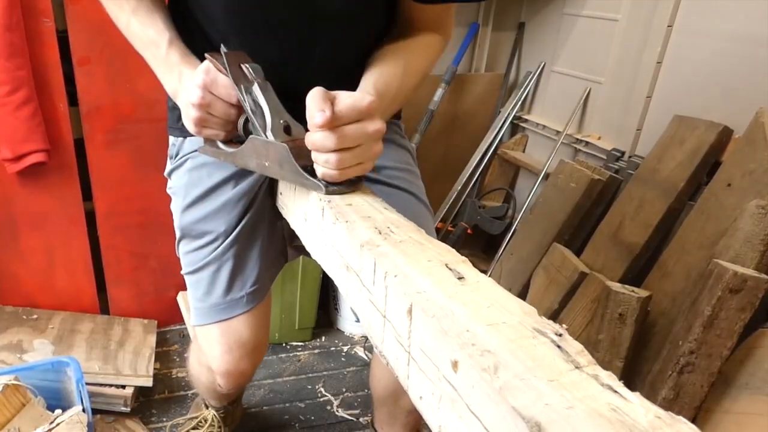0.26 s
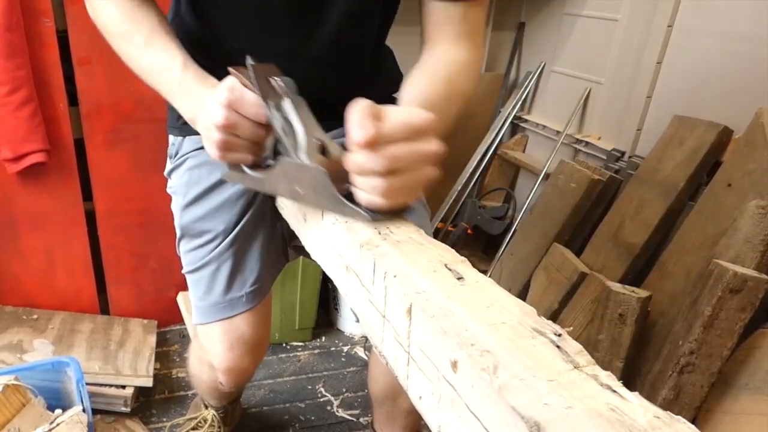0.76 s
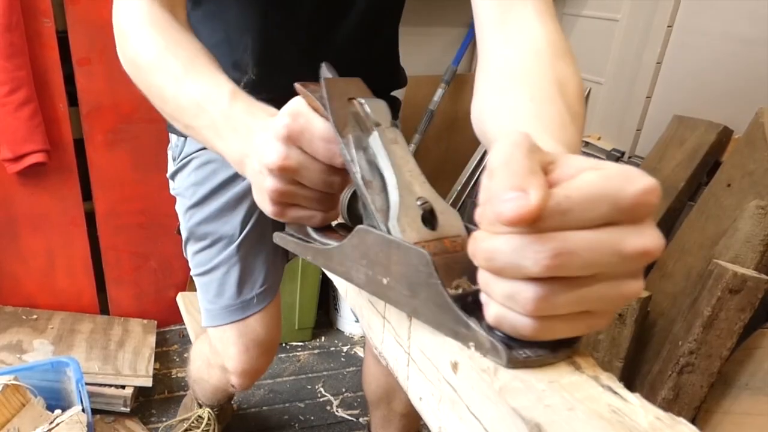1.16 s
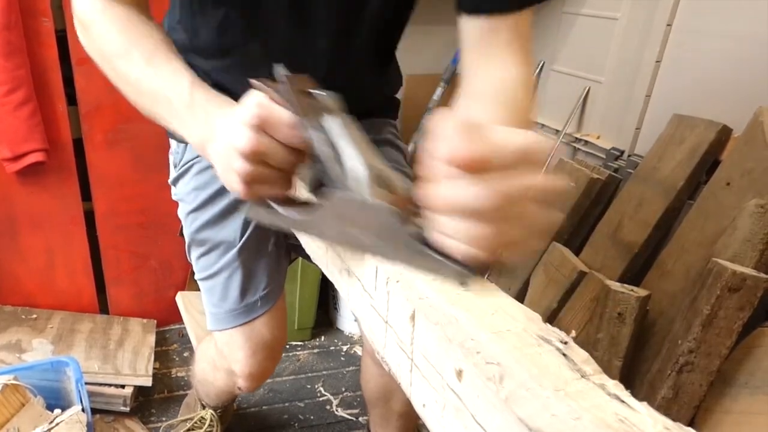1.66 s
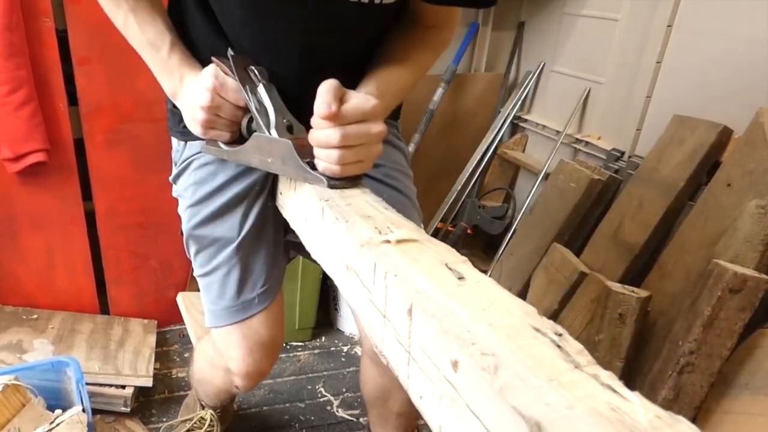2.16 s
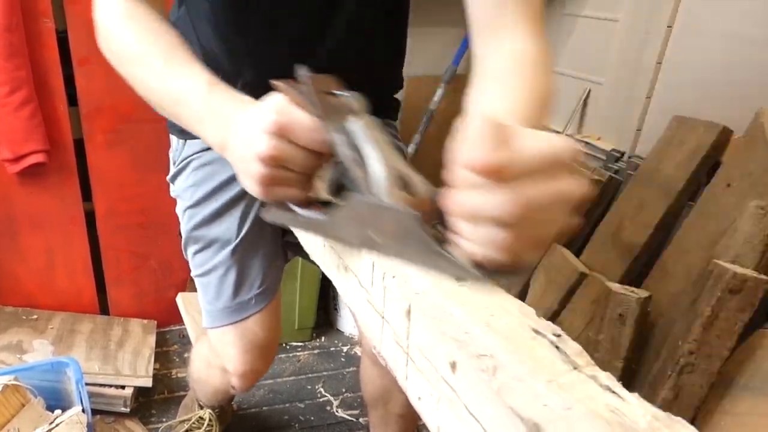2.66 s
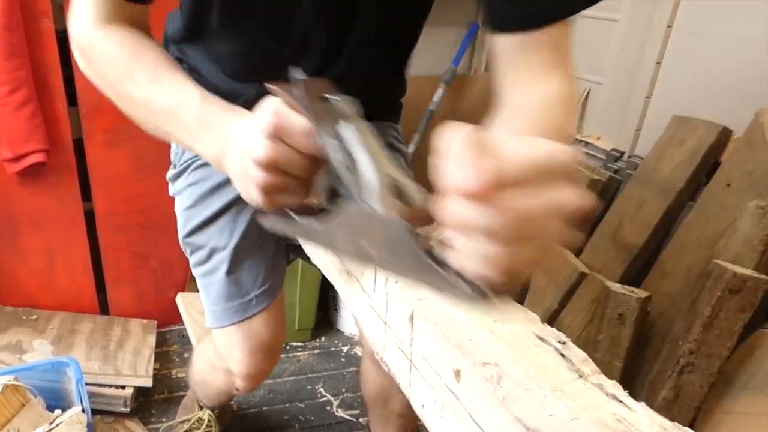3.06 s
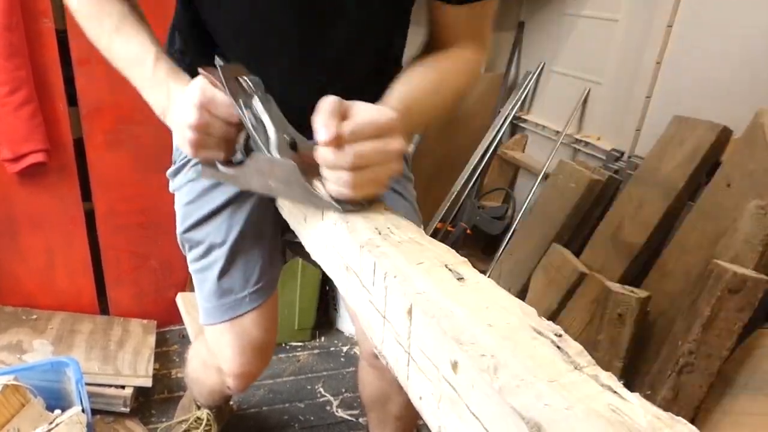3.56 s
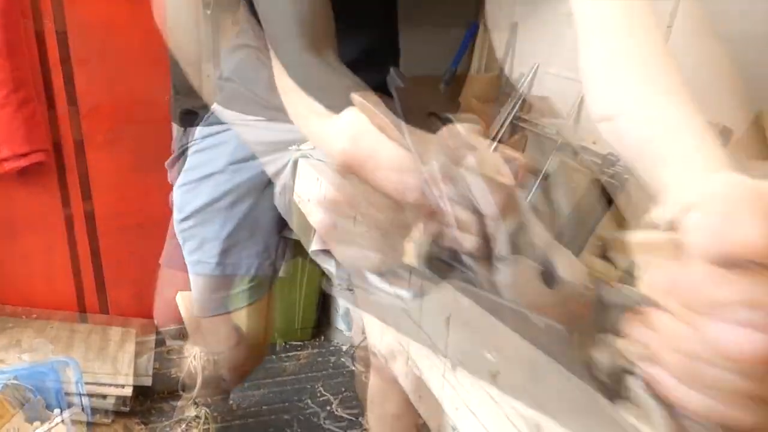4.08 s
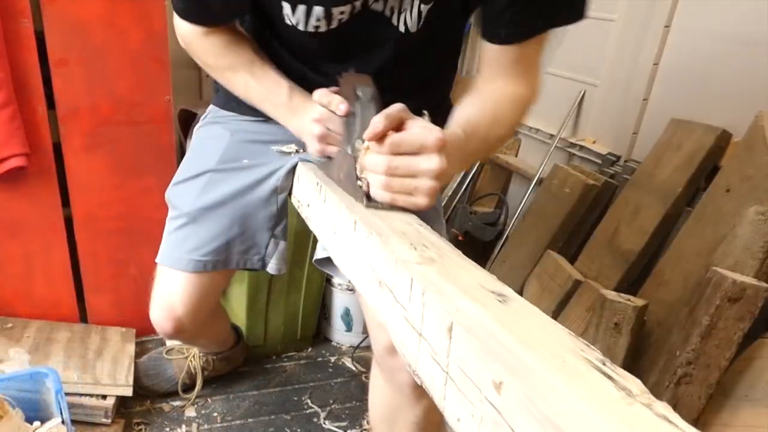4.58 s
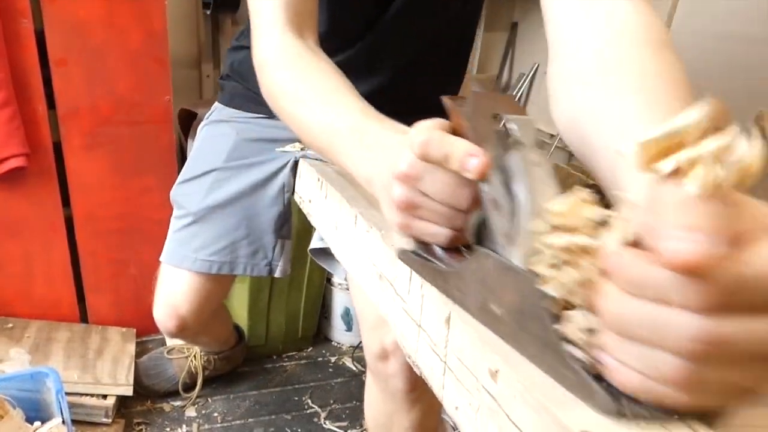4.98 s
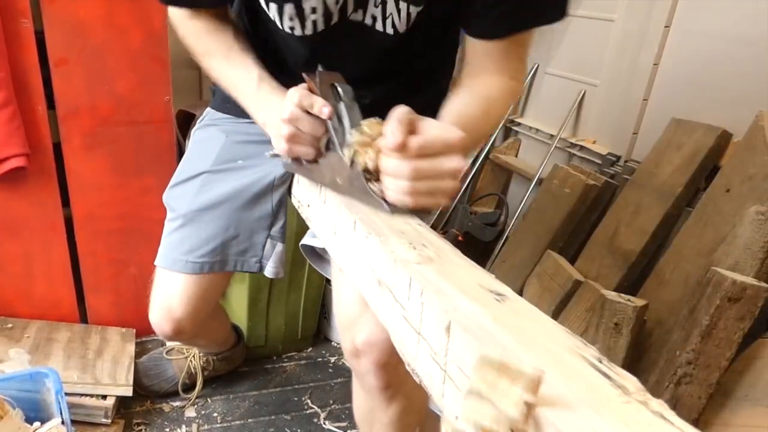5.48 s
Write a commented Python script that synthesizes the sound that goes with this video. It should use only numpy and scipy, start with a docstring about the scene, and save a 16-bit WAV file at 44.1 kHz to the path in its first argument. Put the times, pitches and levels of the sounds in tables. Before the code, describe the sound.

Eight quick back-and-forth planing strokes on wood, miked closely in stereo with short hard room reflections. Returns rattle, knock and groan low in the post; forward strokes bite, rip and hiss, some dropping in pitch. Raw, gritty and irregular at first, then fuller and more even, with long shavings crackling near the end over a faint room rush.

```python
"""A small workshop: a steel hand plane is dragged back eight times along a rough wooden post,
each return followed by a quick forward stroke. Raw face turns flat midway.
Sole: filtered slip grains judder, filtered noise hisses; bumps and drags ring or hum the post's modes.
Blade: two damped modes chirp and ping; falling noise bands rasp; noise bursts snap splinters.
Forward strokes tear off shavings as dense cracks, the last ones long and rustling."""
import sys
import numpy as np
from scipy import signal
from scipy.fft import rfft, irfft, next_fast_len
from scipy.io import wavfile
from scipy.ndimage import uniform_filter1d, map_coordinates

SR = 44100
rng = np.random.default_rng(int(sys.argv[2]) if len(sys.argv) > 2 else 0)


def unload_audio(sound):
    """Save the sound as a 16-bit wav file, at the path given as the first command line argument."""
    columns = np.transpose(np.atleast_2d(sound))
    # keep every value between -1 and 1, then stretch to whole-number steps
    steps = np.round(np.clip(columns, -1, 1) * 32767)
    wavfile.write(sys.argv[1], SR, steps.astype(np.int16))


N = 252693
T_S = np.arange(N) / SR
RING_S = np.arange(SR // 5) / SR  # time after a blow


def amp(db):
    """dB to linear gain."""
    return 10 ** (np.asarray(db) / 20)


def unit(x):
    """Scale to rms 1."""
    return x / np.sqrt(np.mean(x ** 2) + 1e-20)


def peaked(x):
    """Scale to peak 1."""
    return x / np.abs(x).max()


def noise(size=N):
    """White Gaussian noise."""
    return rng.standard_normal(size)


def fade(t60_s):
    """Exponential decay after a blow, -60 dB at t60_s."""
    return np.exp(-np.log(1000) * RING_S / t60_s)


def along(points, hz):
    """Interpolate (f/Hz, value) points on a log axis."""
    f, v = np.transpose(points)
    return np.interp(np.log(hz + 1), np.log(f), v)


def wobble(rate_hz):
    """Smooth random curve, rate_hz knots per second."""
    knots = noise(int(N * rate_hz / SR) + 4)
    return map_coordinates(knots, [np.arange(N) * rate_hz / SR])


def colour(x, points):
    """Minimum-phase filter of the given (f/Hz, level/dB) shape, via the folded cepstrum."""
    m = 2 * next_fast_len(len(x) // 2 + 4096)
    gain = amp(along(points, np.fft.rfftfreq(m, 1 / SR)))
    cepstrum = irfft(np.log(gain))
    cepstrum[1:m // 2] *= 2
    cepstrum[m // 2 + 1:] = 0
    return irfft(rfft(x, m) * np.exp(rfft(cepstrum)))[:len(x)]


def ring(modes):
    """Impulse response of damped modes, alternating in sign."""
    response = np.zeros(len(RING_S))
    for k, (hz, db, t60_s) in enumerate(modes):
        response += (-1) ** k * amp(db) * fade(t60_s) * np.sin(2 * np.pi * hz * RING_S)
    return response


def varied(modes):
    """Per-blow mode mix: common detuning (sd 2.5 %), independent levels (sd 2.5 dB)."""
    tuning = 1 + rng.standard_normal() * np.array([.025, 0, 0])
    levels = noise((len(modes), 1)) * [0, 2.5, 0]
    return np.asarray(modes) * tuning + levels


def through(x, response):
    """Convolve, keep the input length."""
    return signal.fftconvolve(x, response)[:len(x)]


def grains(rate_hz, spread_db):
    """Tiny slips at random moments, of random size and sign, rms 1."""
    sizes = amp(spread_db * np.clip(noise(), -2, 2)) * rng.choice([-1, 1], N)
    return unit(sizes * (rng.random(N) < rate_hz / SR))


def wavering(x, depth_s, rate_hz):
    """Randomly drifting delay: detunes a ring."""
    return map_coordinates(x, [np.arange(N) + depth_s * SR * wobble(rate_hz)])


def swept(hz, width_hz):
    """Rms-1 noise band centred on the curve hz: slow noise pair on a quadrature carrier."""
    pole = np.exp(-np.pi * width_hz / SR)
    slow = signal.lfilter([1], np.poly([pole, pole]), noise((2, len(hz))))
    phase = 2 * np.pi * np.cumsum(hz) / SR
    return unit(slow[0] * np.cos(phase) + slow[1] * np.sin(phase))


def add(track, s, sound):
    """Mix a sound into a track at time s."""
    start = max(round(s * SR), 0)
    track[start:start + len(sound)] += sound[:N - start]


def room_tone(floor_db):
    """Faint steady rush of the room: coloured noise."""
    shape = [(25, -47), (80, -9.5), (300, -8.0), (15000, -45.5)]
    return amp(floor_db) * unit(colour(noise(), shape))


def echo(x, t60_s, gap_s):
    """Cluttered-wall reflections: decaying noise tails, redrawn every 0.1 s as the plane travels."""
    hop = SR // 10
    window = signal.get_window("hann", 2 * hop)
    padded = np.pad(x, (hop, 2 * hop))
    track = np.zeros(len(padded) + len(RING_S))
    for start in range(0, N + hop, hop):
        tail = noise(len(RING_S)) * fade(t60_s) * (RING_S > gap_s)
        answer = signal.fftconvolve(window * padded[start:start + 2 * hop], tail / np.linalg.norm(tail))
        track[start:start + len(answer)] += answer
    return track[hop:hop + N]


# stereo side spectrum: f/Hz, level/dB
SIDE_SPECTRUM = [(60, -6.5), (280, -17.5), (600, -7), (2000, -5.5), (4000, -10.5), (9000, -6.5)]
# channel tilt: f/Hz, left over right/dB
LEFT_OVER_RIGHT = [(250, 0.2), (1100, -2.5), (4000, -0.6)]


def workshop(x, wet_db):
    """Close walls: echo thickens the mid, a shorter echo spreads the sides, a tilt leans the channels."""
    mid = x + amp(wet_db) * colour(echo(x, t60_s=0.11, gap_s=0.0047), [(350, -3), (1200, -4.5)])
    side = colour(echo(x, t60_s=0.028, gap_s=0.0049), SIDE_SPECTRUM)
    channels = []
    for sign in (1, -1):
        tilt = [(hz, sign * db / 2) for hz, db in LEFT_OVER_RIGHT]
        channels.append(colour(mid + sign * side, tilt))
    return np.array(channels)


# snap spectrum: f/Hz, level/dB
SNAP_SPECTRUM = [(800, 5.5), (4400, 18.5), (12800, 6.5), (16000, -10)]
# splinters: t/s, relative level/dB, crumble re crack/dB
SNAPS = [(0.09, -8, -10), (0.399, -19.5, 6), (0.4945, -17, -18), (1.032, -16, -18), (1.086, -29, 4),
         (1.3682, -3.5, -20), (2.0054, -13, -24), (2.033, -14, -11), (2.402, -16.5, 0), (2.733, -14.5, 9),
         (3.059, -15.5, 2), (3.3975, -13.5, -14), (3.5777, -16, -15.5), (3.78, -12, -6), (3.8427, -10, -20),
         (5.504, -13, 11)]


def snaps(snap_db, crumble_t60_s):
    """A splinter cracks off as a noise burst; a slower tail crumbles under the sole, strong on some."""
    track = np.zeros(N)
    for s, db, crumble_db in SNAPS:
        decay = fade(.008) + amp(crumble_db) * fade(crumble_t60_s)
        burst = noise(len(RING_S)) * decay
        add(track, s, amp(db + snap_db) * peaked(colour(burst, SNAP_SPECTRUM)))
    return track


# blade and cap-iron modes: f/Hz, level/dB, t60/s
BLADE_MODES = [(1633, 9, 0.051), (1190, -3.5, 0.067)]
# blade catches: t/s, relative level/dB
CHIRPS = [(0.0826, -24), (0.4778, -26), (0.703, -22.5), (1.331, -39), (1.383, -41), (1.419, -38),
          (1.596, -23.5), (1.76, -32), (1.8176, -29.5), (2.044, -34.5), (3.1616, -31), (3.385, -35.5),
          (3.41, -34), (3.49, -39), (3.582, -30.5), (5.5, -22.5)]


def chirps(chirp_db, swell_s, tail_db):
    """The edge sticks and slips near the first listed blade mode for a few cycles, then lets go."""
    track = np.zeros(N)
    for s, db in CHIRPS:
        hz = BLADE_MODES[0][0] * (1 + 0.02 * rng.standard_normal())
        stick_slip = np.exp(-(RING_S / swell_s - 1.3) ** 2) * np.sin(2 * np.pi * hz * RING_S)
        tail = amp(tail_db) * ring(varied(BLADE_MODES))
        add(track, s - .001, amp(db + chirp_db) * (stick_slip + tail))
    return track


# post-on-trestle modes: f/Hz, level/dB, t60/s
POST_MODES = [(174.4, -5.5, 0.11), (309.7, 0, 0.15), (371.1, -5.5, 0.22), (454, -10.5, 0.12),
              (668, -13, 0.17)]
# thud spectrum: f/Hz, level/dB
THUD_SPECTRUM = [(25, -54.5), (80, -14.5), (160, -0.5), (330, 0.5), (680, -3), (850, -9), (1500, -15.5),
                 (8000, -62.5)]
# sole hits a bump: t/s, relative level/dB, tock f/Hz, hardness (clack gain)/dB
KNOCKS = [(0.36, -10, 667, -2), (0.491, -9.5, 465, -4), (0.760, -7, 519, -4), (0.866, -10.5, 484, -4),
          (1.033, -8, 550, -6), (1.322, -10.5, 420, -2.5), (1.458, -10, 646, -7), (1.612, -5, 472, -13),
          (1.655, -6.5, 405, -30), (1.803, -7.5, 507, -19), (2.028, -7, 597, -11), (2.151, -8, 610, -12),
          (2.266, -6, 480, -8), (2.279, -7.5, 493, -18), (2.33, -8, 572, -39), (2.689, -9.5, 463, -2),
          (2.85, -8.5, 610, -1.5), (3.008, -6, 425, -6.5), (3.103, -9.5, 494, -7), (3.661, -18, 646, 2),
          (4.172, -23.5, 526, 1.5), (4.295, -12, 640, -13), (4.479, -23.5, 590, 5.5),
          (4.595, -12.5, 707, 2.5), (4.698, -8, 445, -4), (4.716, -12.5, 850, -24), (4.987, -7, 452, -18),
          (5.197, -11, 593, -3), (5.22, -10, 616, -7), (5.263, -11.5, 444, -7.5), (5.301, -12, 424, -16),
          (5.568, -7, 623, -21)]


def knocks(tock_db, post_db, thud_db, clack_db, tock_t60_s, thud_t60_s, clack_t60_s, grip_s):
    """Per bump: hollow tock, noise thud, hardness-scaled clack, post boom that builds until the grip smothers it."""
    track = np.zeros(N)
    size = len(RING_S)
    for s, db, hz, hardness_db in KNOCKS:
        tock = peaked(np.sin(2 * np.pi * hz * RING_S) * fade(tock_t60_s) * (1 - fade(0.0025)))
        thud = peaked(colour(noise(size) * fade(thud_t60_s), THUD_SPECTRUM))
        crack = signal.unit_impulse(size) + 0.18 * noise(size) * fade(clack_t60_s)
        clack = peaked(colour(crack, [(350, -13.0), (700, 18.0), (2000, -2.5), (14000, -32.0)]))
        boom = peaked(ring(varied(POST_MODES)) * RING_S * np.exp(-(RING_S / grip_s) ** 2))
        body = amp(tock_db) * tock + amp(thud_db) * thud + amp(post_db) * boom
        add(track, s, amp(db) * (body + amp(clack_db + hardness_db) * clack))
    return track


def raw_face(flat_from_s=3.85):
    """1 while the face is raw, 0 once it is planed flat."""
    return np.interp(T_S, [flat_from_s, flat_from_s + 0.035], [1, 0])


def roughness(left=0.73):
    """1 on the raw face, `left` once it is planed flat."""
    return left + (1 - left) * raw_face()


EDGE_DB = 27  # rise over one attack time, fall per release time


def stroke(start_s, length_s, crest_s, swell_db, fade_db, attack_s, release_s):
    """Gain of one movement: attack, swell to the crest, fade to the end, release."""
    t = T_S - start_s
    hold_db = np.interp(t, [0, min(crest_s, length_s), length_s], [-swell_db, 0, -fade_db])
    edges = np.maximum(-t, 0) / attack_s + np.maximum(t - length_s, 0) / release_s
    return amp(hold_db - EDGE_DB * edges)


PUSH_ATTACK_S, PUSH_RELEASE_S = 0.024, 0.12  # blade bites; arms run out of reach
RETURN_ATTACK_S, RETURN_RELEASE_S = 0.012, 0.029


def push(start_s, length_s, crest_s, swell_db, fade_db):
    """Gain of a forward stroke."""
    return stroke(start_s, length_s, crest_s, swell_db, fade_db, PUSH_ATTACK_S, PUSH_RELEASE_S)


def pull(start_s, length_s, crest_s, swell_db, fade_db):
    """Gain of a return stroke."""
    return stroke(start_s, length_s, crest_s, swell_db, fade_db, RETURN_ATTACK_S, RETURN_RELEASE_S)


# forward strokes: start t/s, length/s, time to fastest rub/s,
# relative judder, scrape, tearing levels/dB, scrape fade/dB
PUSHES = [(0.341, 0.26, 0.19, -18, -27.5, -25, 20), (0.979, 0.19, 0.13, -19.5, -30.5, -22.5, 10),
          (1.59, 0.28, 0.14, -22.5, -32, -33, 2), (2.255, 0.2, 0.3, -19, -30, -47, 4),
          (2.981, 0.21, 0.11, -16.5, -28.5, -30, 2.5), (3.772, 0.18, 0.075, -17.5, -34, -20.5, 1),
          (4.547, 0.37, 0.027, -24.5, -30.5, -21.5, 13), (5.451, 0.5, 0.063, -22, -28.5, -58, 11)]


def pushing():
    """1 during a forward stroke, ramping to 0 outside."""
    total = np.zeros(N)
    for s, length, *_ in PUSHES:
        corners = [s - PUSH_ATTACK_S, s, s + length, s + length + PUSH_RELEASE_S]
        total += np.interp(T_S, corners, [0, 1, 1, 0])
    return total


# return strokes: start t/s, length/s, time to heaviest judder/s,
# relative judder, scrape levels/dB, scrape fade/dB
RETURNS = [(0.054, 0.33, 0.12, -20.5, -32, 38), (0.68, 0.22, 0.053, -19.5, -33, 27),
           (1.3, 0.25, 0.082, -22.5, -29, 39), (1.938, 0.24, 0.021, -22, -29.5, 16.5),
           (2.572, 0.41, 0.09, -24, -40.5, 15), (3.398, 0.27, 0.16, -19, -36.5, 16),
           (4.164, 0.36, 0.29, -25, -37.5, 8), (4.978, 0.44, 0.34, -25.5, -35.5, 11.5)]
SHUFFLE_S, SHUFFLE_JUDDER_DB, SHUFFLE_SCRAPE_DB = 0.055, -41, -45.5


def shuffles():
    """Small slide leading into each return, stronger while the face is raw."""
    return roughness() ** 2 * sum(pull(s - SHUFFLE_S, SHUFFLE_S, 0, 0, 0) for s, *_ in RETURNS)


def curl(s, half_s, db):
    """Gaussian swell of one long shaving coming free."""
    return amp(db) * np.exp(-((T_S - s) / half_s) ** 2)


# long shavings leave the mouth: loudest t/s, half-length/s, relative level/dB
CURLS = [(4.81, 0.041, -31), (5.647, 0.029, -35)]


def curls():
    """Swells of all the long shavings."""
    return sum(curl(*row) for row in CURLS)


def weight():
    """Bearing of the sole: peaks early in a push, and on each return where it rides the ridges."""
    total = amp(SHUFFLE_JUDDER_DB) * shuffles()
    for s, length, _, db, *_ in PUSHES:
        total += amp(db) * push(s, length, crest_s=0.071, swell_db=7.5, fade_db=14.5)
    for s, length, crest, db, *_ in RETURNS:
        total += amp(db) * pull(s, length, crest, swell_db=8.0, fade_db=14.5)
    return total


FASTEST_SHARE = 0.31  # fraction of a return at top speed


def rubbing():
    """Rub gain: swells to the fastest moment of a stroke, fades as the plane slows."""
    total = curls() + amp(SHUFFLE_SCRAPE_DB) * shuffles()
    for s, length, crest, _, db, _, fall_db in PUSHES:
        total += amp(db) * push(s, length, crest, swell_db=1.0, fade_db=fall_db)
    for s, length, *_, db, fall_db in RETURNS:
        total += amp(db) * pull(s, length, FASTEST_SHARE * length, swell_db=8.0, fade_db=fall_db)
    return total


BITE_FADE_DB = 21


def bite(curl_db=-4):
    """Tearing gain: deepest as the blade enters, again as a long shaving comes free."""
    total = amp(curl_db) * curls()
    for s, length, *_, db, _ in PUSHES:
        total += amp(db) * push(s, length, crest_s=0.0084, swell_db=9.5, fade_db=BITE_FADE_DB)
    return total


def chatter(chatter_db):
    """The edge catches on raw grain; each catch pings the blade, most freely on the way back."""
    catches = grains(rate_hz=65, spread_db=2)
    response = ring(BLADE_MODES) * (1 - fade(0.008))
    pings = wavering(through(catches, response), depth_s=.0003, rate_hz=45)
    contact = np.sqrt(weight() * rubbing()) * raw_face() * (1 - .5 * pushing())
    return amp(chatter_db) * contact * unit(pings)


# stick-slip on returns: start t/s, length/s, relative level/dB
GROANS = [(0.779, 0.13, -19.5), (1.298, 0.22, -23), (2.682, 0.087, -21.5), (4.31, 0.16, -23)]


def groans(groan_db, overtone_db):
    """Dragged back, the sole sticks and slips: a hum and octave waver about the post's strongest mode."""
    hz = POST_MODES[1][0] * (1 + .06 * wobble(60))
    phase = 2 * np.pi * np.cumsum(hz) / SR
    hum = np.sin(phase) + amp(overtone_db) * np.sin(2 * phase)
    tone = unit(hum * amp(4.5 * np.minimum(wobble(50), 1)))
    return amp(groan_db) * tone * sum(amp(db) * pull(s, length, 0, 0, 0) for s, length, db in GROANS)


# blade digs in: t/s, relative level/dB, drop time/s
DIGS = [(0.982, -15, 0.05), (1.597, -12.5, 0.0192), (2.265, -14.5, 0.038), (4.56, -16, 0.066),
        (5.497, -23.5, 0.033)]
DIG_START_HZ, DIG_AT_DROP_TIME_HZ = 1500, 843  # glide goes on to twice the drop time


def digs(dig_db, width_hz, attack_t60_s):
    """The edge's rasp falls in pitch as the cut deepens and loads the blade: a gliding noise band."""
    track = np.zeros(N)
    for s, db, drop_s in DIGS:
        hz = DIG_START_HZ * (DIG_AT_DROP_TIME_HZ / DIG_START_HZ) ** np.minimum(RING_S / drop_s, 2)
        envelope = (1 - fade(attack_t60_s)) * np.exp(-(RING_S / drop_s) ** 2)
        add(track, s, amp(db + dig_db) * swept(hz, width_hz) * envelope)
    return track


CURL_CENTRE_HZ, CURL_SAG_S = 2823, 0.091  # band centre when loudest; time to fall by a factor e


def rustles(rustle_db):
    """Each long shaving rustles from the mouth; its noise band darkens as it lengthens."""
    total = np.zeros(N)
    for s, half_s, db in CURLS:
        age = np.clip((T_S - s) / CURL_SAG_S, -1, 1)
        total += curl(s, half_s, db) * swept(CURL_CENTRE_HZ * np.exp(-age), width_hz=2600)
    return amp(rustle_db) * total


# tearing spectrum: f/Hz, level/dB
TEAR_SPECTRUM = [(250, -16.5), (600, 3.5), (1150, 3.5), (1900, 2), (3500, -7), (14000, -38.5)]


def shavings(tear_db, flutter_db):
    """The shaving breaks in a dense run of small cracks as it curls up the cap iron."""
    cracks = grains(rate_hz=1500, spread_db=-4.0) * amp(flutter_db * wobble(130))
    return bite() * amp(tear_db) * unit(colour(cracks, TEAR_SPECTRUM))


# scrape spectrum: f/Hz, level/dB
SCRAPE_SPECTRUM = [(200, -32), (900, 7), (2400, -2.5), (6500, 0.5), (8000, -5.5), (10200, -2.5),
                   (13000, -14.5), (15500, -24)]
# high modes of the steel body: f/Hz
STEEL_MODES_HZ = [2490, 2574, 3060, 3494, 3860, 4260]


def fibres(fibre_db, rip_db, steel_t60_s):
    """Raw fibres break one by one: each rings the steel in a new mode mix; pushes add short dry rips."""
    breaks = grains(rate_hz=95, spread_db=3.5)
    steel = np.zeros(N)
    for hz in STEEL_MODES_HZ:
        mode = np.sin(2 * np.pi * hz * RING_S) * fade(steel_t60_s)
        steel += through(breaks * noise(), mode)
    rips = through(breaks, fade(0.016)) * noise()
    ripping = amp(rip_db) * unit(colour(rips, SCRAPE_SPECTRUM)) * pushing()
    ringing = amp(fibre_db) * unit(steel) * (1 + pushing())
    return (ringing + ripping) * rubbing() * raw_face()


def patchy(x, patchy_db):
    """Tufts of fibres differ in colour: random gain patches in time and frequency."""
    z = signal.stft(x, nperseg=256)[2]
    field = uniform_filter1d(noise(z.shape), size=4, axis=0)
    field = uniform_filter1d(field, size=5, axis=1)
    return signal.istft(z * amp(patchy_db * unit(field)), nperseg=256)[1][:N]


def scrape(hiss_db, sweep_db, flutter_db):
    """Fibres flick past the steel: a hiss that flutters most when raw, plus a duller sweep on the flat face."""
    raw = roughness()
    rub = noise() * amp(flutter_db * raw * wobble(110))
    rub = raw * patchy(rub, patchy_db=3.5) + (1 - raw) * rub
    rub = rub * (1 - .5 * pushing() * raw_face())  # cutting raw wood rips more than it rubs
    hiss = amp(hiss_db) * unit(colour(rub, SCRAPE_SPECTRUM))
    sweep = amp(sweep_db) * (1 - raw) * unit(colour(noise(), TEAR_SPECTRUM))
    return rubbing() * (hiss + sweep)


def judder(thud_db, back_thud_db, rasp_db, post_db, flutter_db, damping):
    """Ridges jolt the sole and a second grain stream booms the post, wavering in pitch, damped in a push."""
    jolts = grains(rate_hz=2500, spread_db=0.5) * amp(flutter_db * wobble(60))
    boom = through(grains(rate_hz=2700, spread_db=2.0), ring(POST_MODES))
    boom = wavering(boom, depth_s=.003, rate_hz=10)
    forward = pushing()
    thud_gain = amp(thud_db * forward + back_thud_db * (1 - forward))
    thud = thud_gain * unit(colour(jolts, THUD_SPECTRUM))
    rasp = amp(rasp_db) * (1 - forward) * unit(colour(jolts, TEAR_SPECTRUM))  # heel rattles when dragged
    return weight() * (thud + rasp + amp(post_db) * unit(boom) * (1 - damping * forward))


def scene():
    """Sum all sources and the room tone, then place them in the workshop."""
    mix = room_tone(floor_db=-40.0)
    mix += snaps(snap_db=-1.0, crumble_t60_s=0.17)
    mix += chirps(chirp_db=9.5, swell_s=0.0031, tail_db=-12.5)
    mix += knocks(tock_db=-2.5, post_db=-7.0, thud_db=-5.0, clack_db=-2.5,
                  tock_t60_s=0.046, thud_t60_s=0.16, clack_t60_s=0.076, grip_s=0.05)
    mix += chatter(chatter_db=-5.5)
    mix += groans(groan_db=0.0, overtone_db=-12.0)
    mix += digs(dig_db=-7, width_hz=620, attack_t60_s=0.0074)
    mix += rustles(rustle_db=5)
    mix += shavings(tear_db=-2, flutter_db=5.0)
    mix += fibres(fibre_db=-14.5, rip_db=-6.5, steel_t60_s=0.044)
    mix += scrape(hiss_db=-2.5, sweep_db=12.5, flutter_db=1.5)
    mix += judder(thud_db=-2.0, back_thud_db=-4.5, rasp_db=-14, post_db=-2.0, flutter_db=3.5, damping=0.58)
    return workshop(mix, wet_db=-3)


TOP_HZ = 15850


def record(dry):
    """Round off the highest peaks, then remove everything from TOP_HZ up."""
    rounded = dry / (1 + (dry / .88) ** 6) ** (1 / 6)
    m = next_fast_len(N + SR // 2)
    kept = np.fft.rfftfreq(m, 1 / SR) < TOP_HZ
    return irfft(rfft(rounded, m) * kept, m)[:, :N]


dry = scene()
out = record(dry)
unload_audio(out)
```